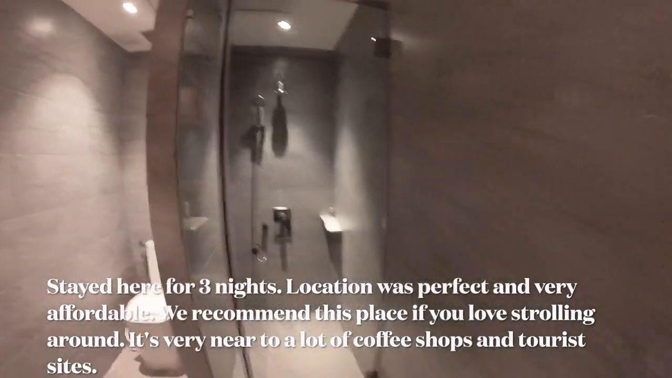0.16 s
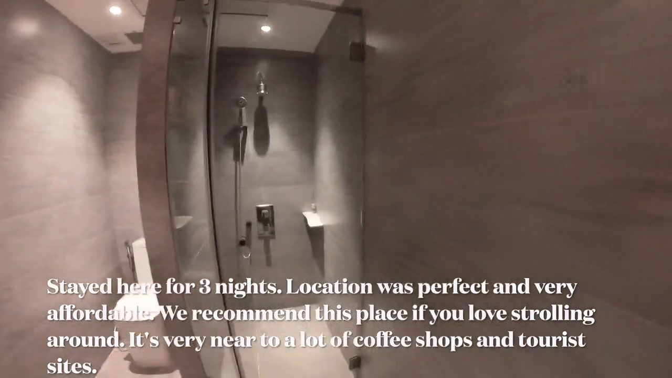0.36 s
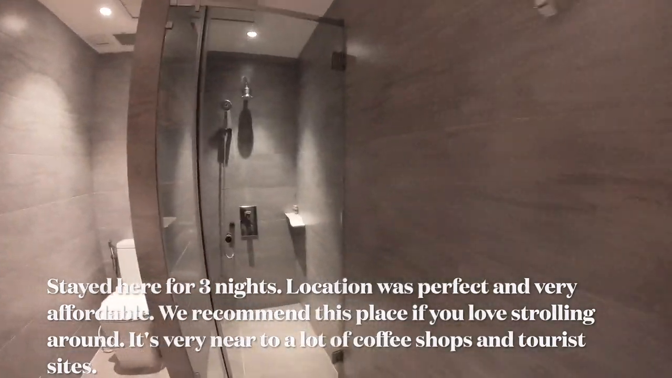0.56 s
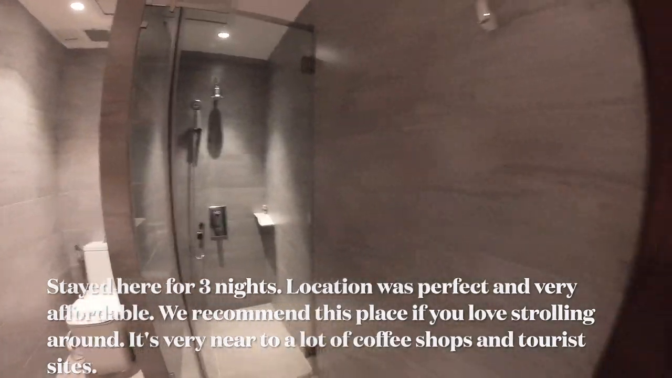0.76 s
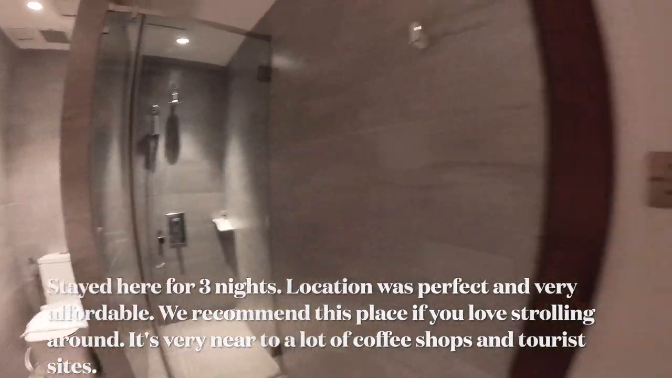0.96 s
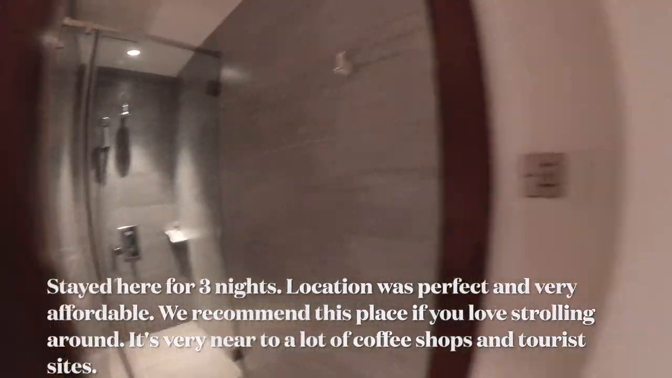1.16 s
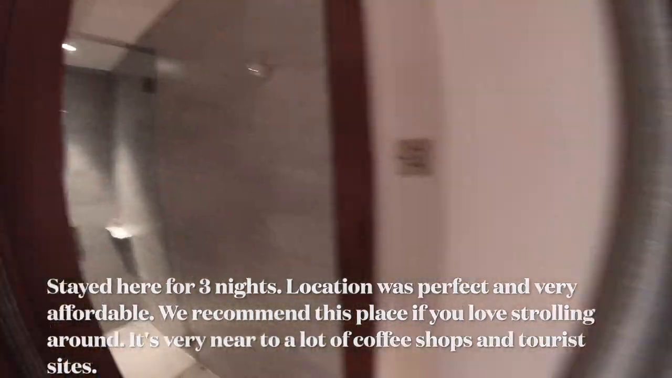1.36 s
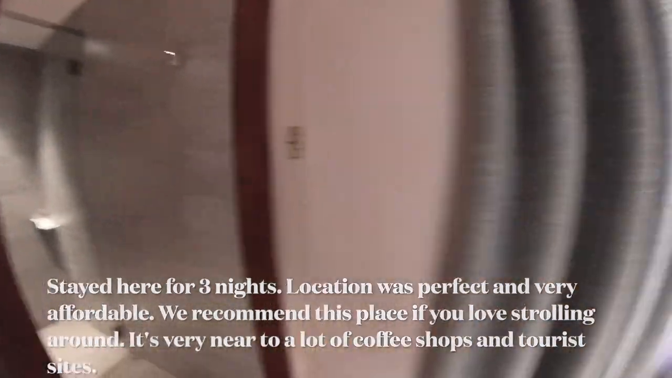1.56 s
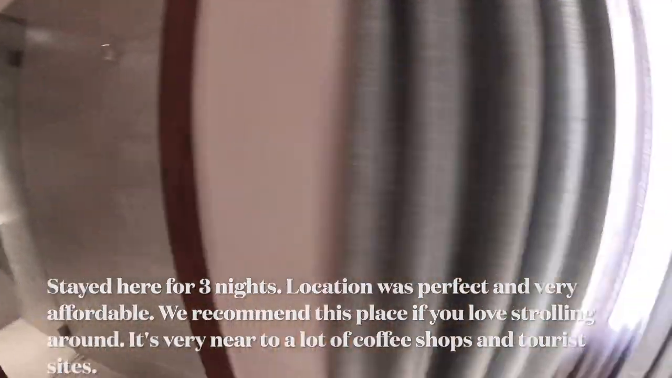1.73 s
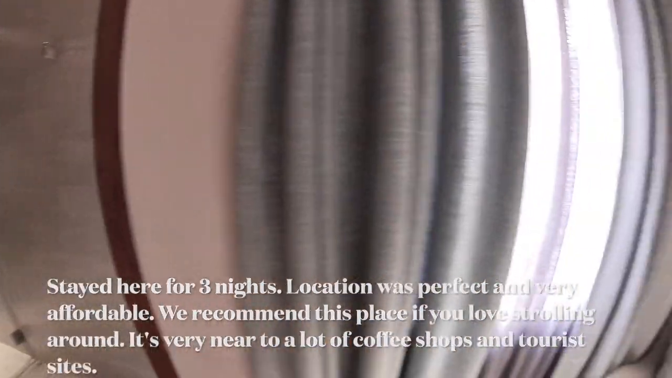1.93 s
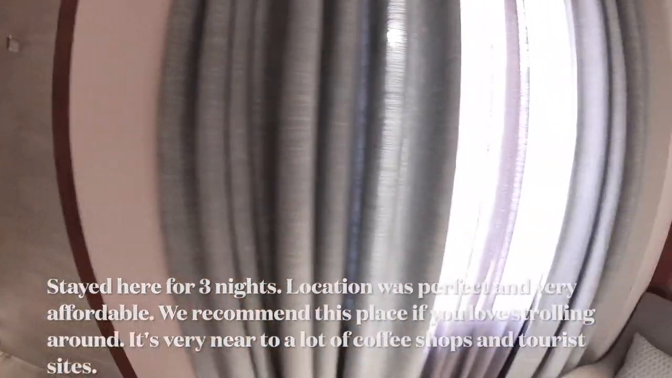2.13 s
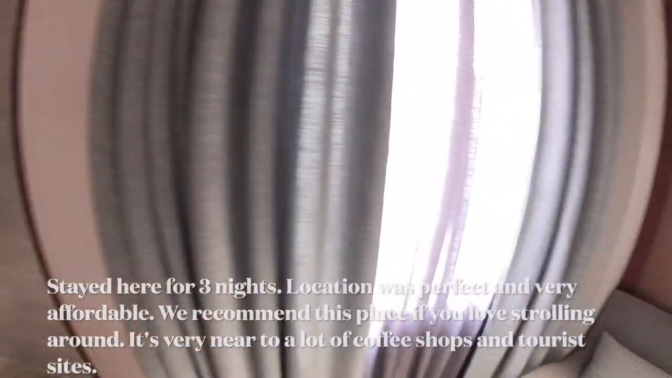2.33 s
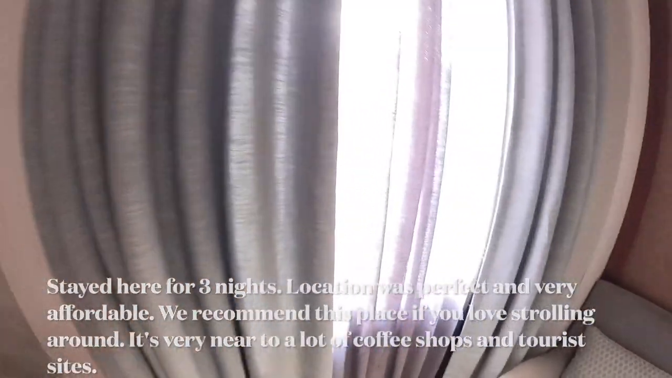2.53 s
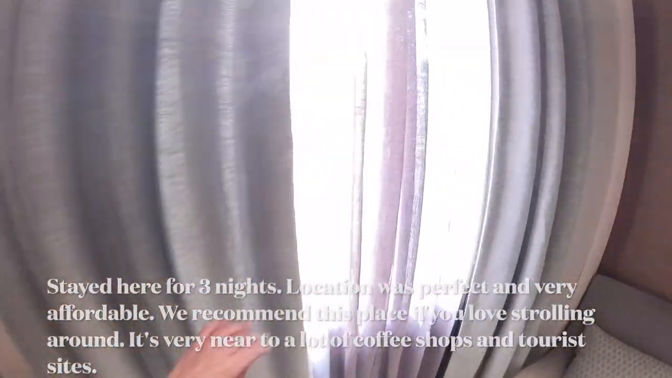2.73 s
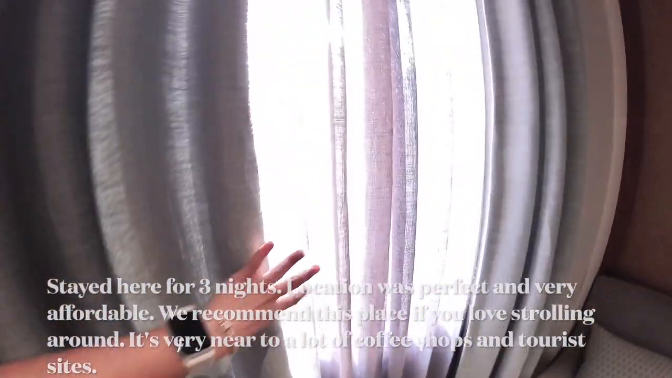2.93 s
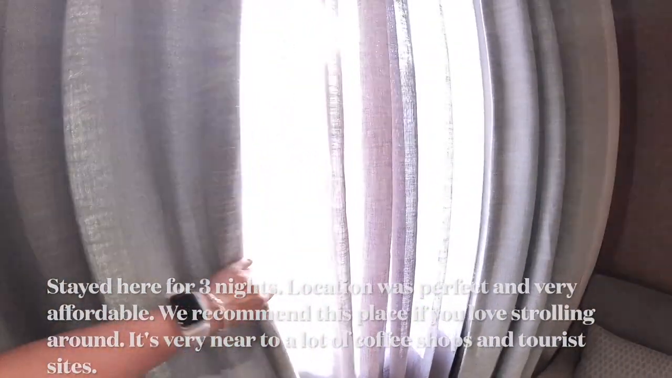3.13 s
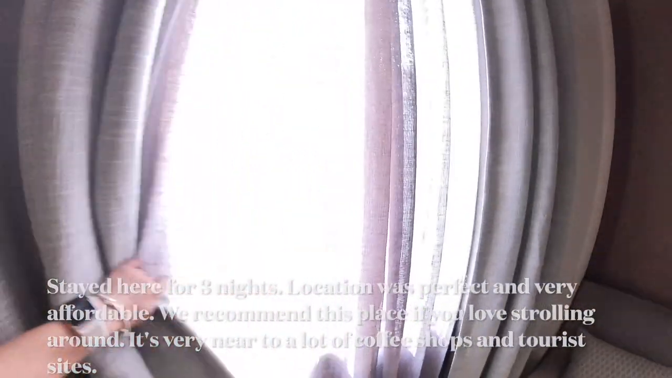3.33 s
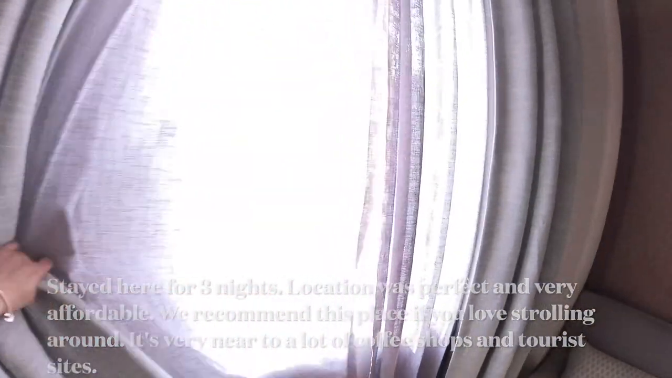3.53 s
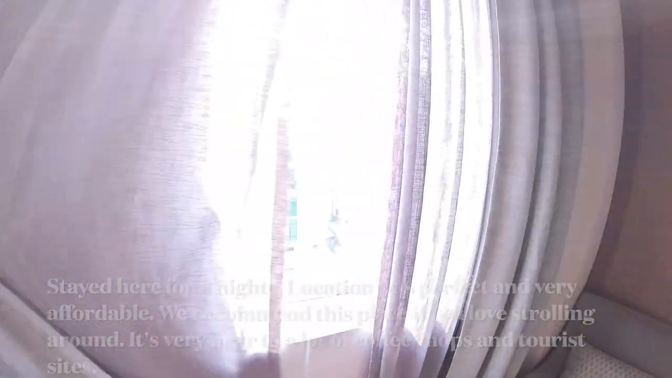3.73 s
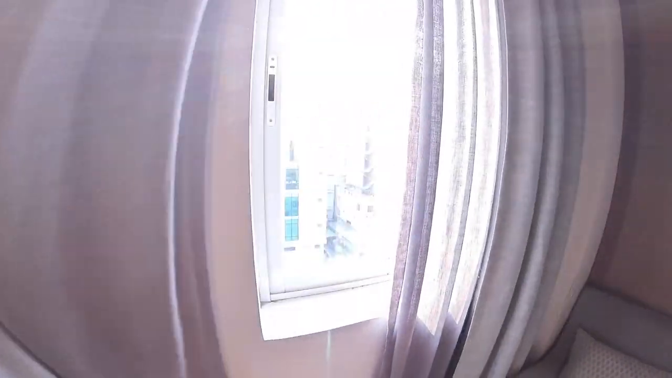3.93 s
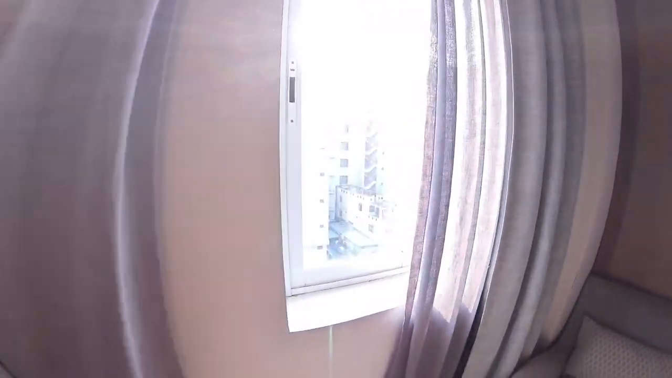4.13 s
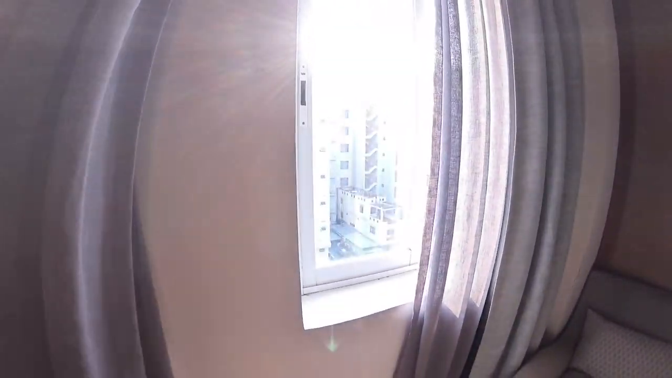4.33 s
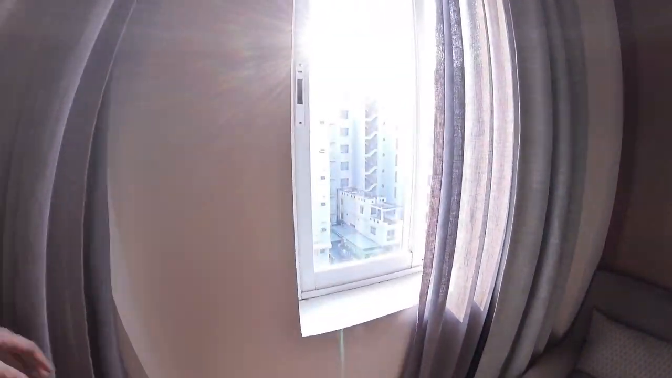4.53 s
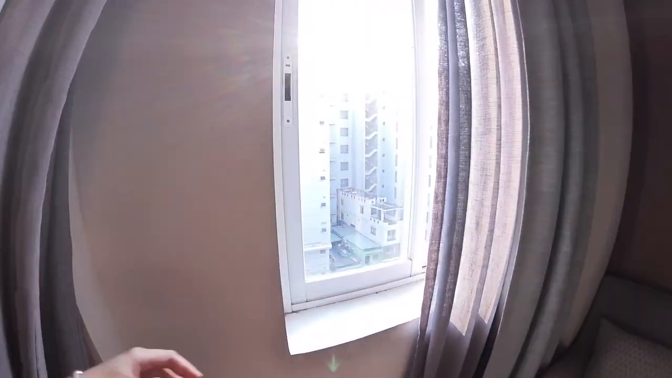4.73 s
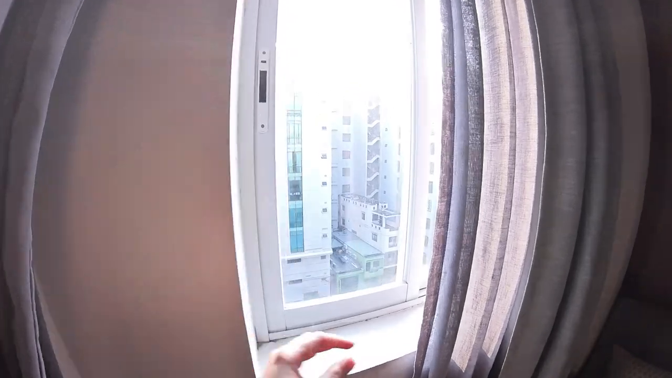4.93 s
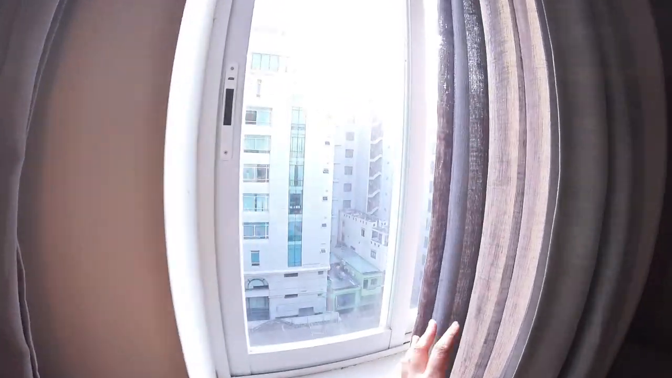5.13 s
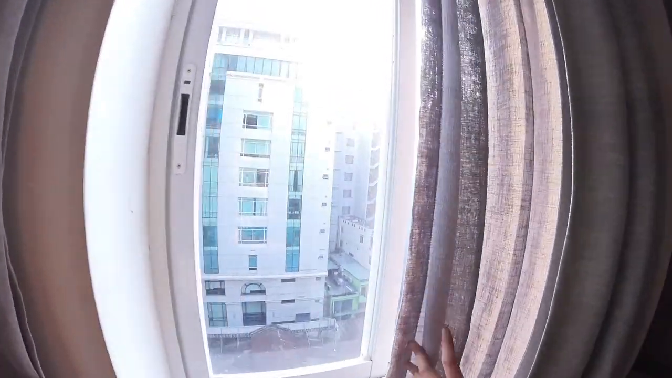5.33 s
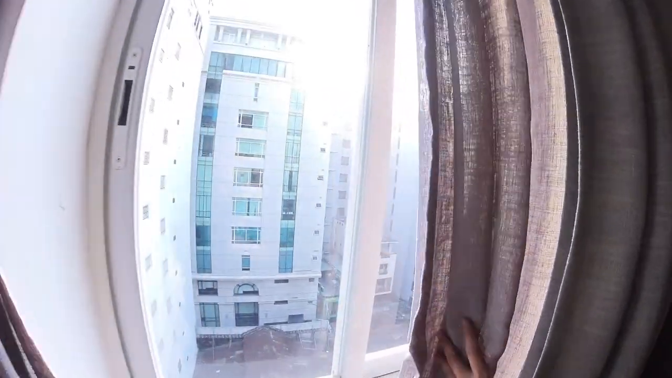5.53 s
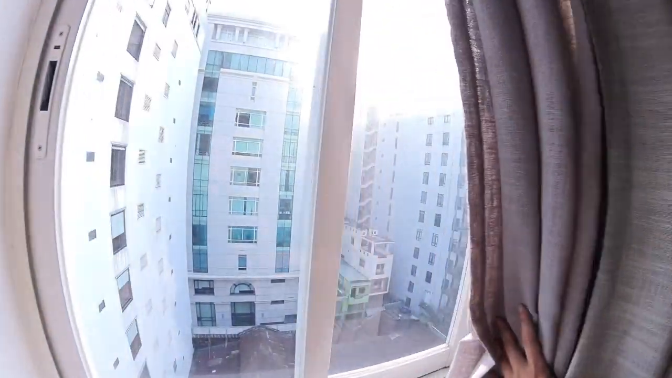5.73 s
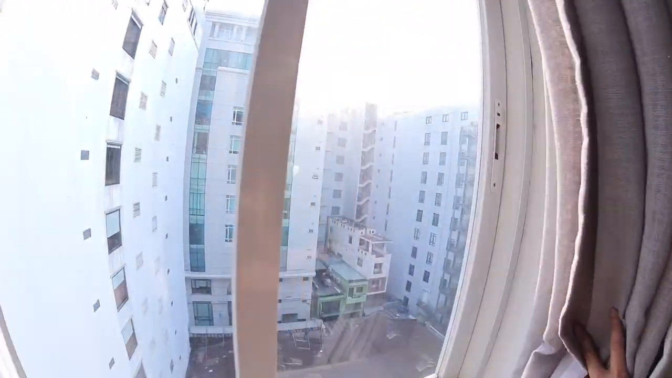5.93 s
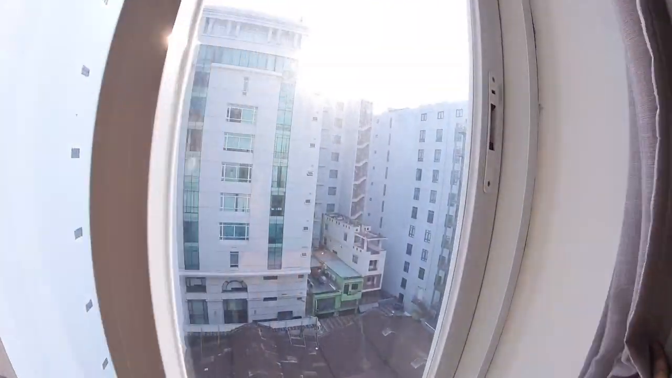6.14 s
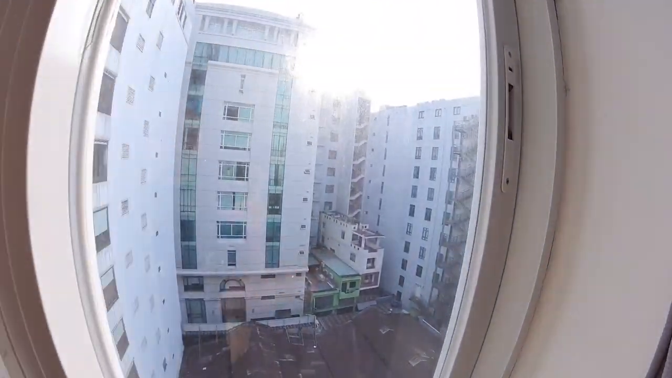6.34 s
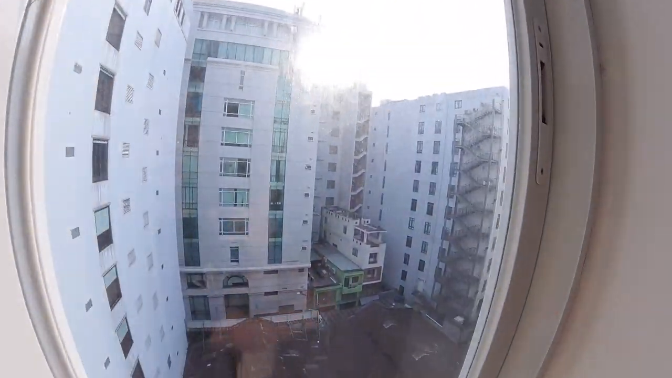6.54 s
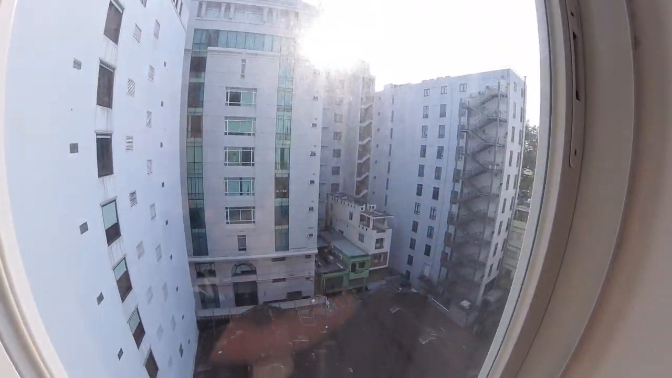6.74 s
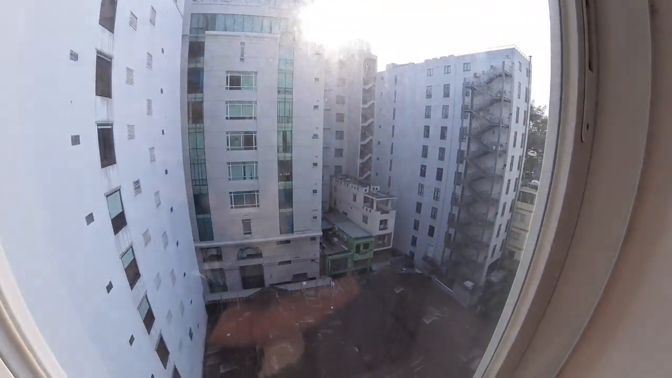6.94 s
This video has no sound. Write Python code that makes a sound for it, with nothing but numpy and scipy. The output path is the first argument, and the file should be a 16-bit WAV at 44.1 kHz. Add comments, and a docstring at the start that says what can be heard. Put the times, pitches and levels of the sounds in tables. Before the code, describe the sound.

Dull heel thuds cross a hotel room floor, then two curtains scrape along a rail with rattling gliders and bright clacks over faint town murmur.

```python
"""Heels thud on the floor of a hotel room: pushes ring the boards and floor modes, and a wall echoes.
Two curtains are drawn: dense slips scrape through the rail, sparser taps ring the gliders,
filtered noise rolls; clicks with a ring make the clacks. Clothes swish in swells of coloured noise.
The town murmurs behind as rumble, traffic wash and hiss, its rumble and wash rising towards the end."""
import sys
import numpy as np
from scipy import signal
from scipy.fft import rfft, irfft
from scipy.io import wavfile
from scipy.ndimage import uniform_filter1d

SR = 44100
rng = np.random.default_rng(int(sys.argv[2]) if len(sys.argv) > 2 else 0)


def put_to_file(sound):
    """Save the sound as 16-bit audio at rate SR, in the file named by the first command-line argument."""
    columns = np.atleast_2d(sound).T  # one column per channel
    safe = np.clip(columns, -1, 1)
    whole_steps = np.round(safe * 32767)
    wavfile.write(sys.argv[1], SR, whole_steps.astype(np.int16))


N = 308160
TIME_S = np.arange(N) / SR
FFT_HZ = np.fft.rfftfreq(N, 1 / SR)

# Footsteps: start_s, level_db, board_hz, heel_corner_hz, sole_slap_db and scuff_db (relative to the step)
STEPS = [(.052, -13, 345, 590, -39, -34), (0.842, -32.5, 342, 400, -41.5, -37),
         (1.340, -17.5, 368, 870, -55, -60), (2.144, -36.5, 385, 660, -41, -52),
         (2.7038, -23, 400, 1020, -31, -56), (3.309, -31, 315, 1860, -26.5, -56),
         (4.893, -32.5, 352, 543, -34, -41), (5.598, -23.5, 354, 750, -29, -55)]
# Dull push of a heel on the floor: freq_hz, level_db
THUD = [(40, -63), (130, -10), (225, 3.5), (330, 0.5), (480, -1), (620, -5), (800, -10), (1100, -18.5),
        (1400, -34), (2500, -56), (8000, -68)]
# Ringing of the whole floor: freq_hz, level_db, t60_s
FLOOR_MODES = [(171, -30, 0.3), (231.8, -13, 0.26), (293, -19.5, 0.37), (374.6, -19, 0.35),
               (430, -14, 0.12), (504, -23.5, 0.18), (637, -23.5, 0.22), (750, -17, 0.064),
               (889, -38, 0.18), (1040, -35, 0.12)]
# Floor giving under the walker's weight: start_s, level_db, pitch_hz
FLOOR_SAGS = [(1.601, -43, 52.7), (1.66, -45, 46)]

# Curtain slides; the short one is a last swing after the first pull:
# start_s, length_s, side, scrape_db, chatter_db, rolling_db, glider_pitch_factor
SLIDES = [(3.406, 0.89, "left", -32.5, -45.5, -41.5, .975), (4.267, 0.2, "left", -55, -76, -55.5, 1.1),
          (5.48, 1.134, "right", -38.5, -47, -39, 0.957)]
# Scrape colour of each half of the rail: freq_hz, level_db
LEFT_RAIL = [(60, -4.5), (170, 13), (480, 11.5), (650, 12), (900, 14), (1080, 8), (1200, 7.5), (1500, 0),
             (2900, 2.5), (5200, -2), (6500, 5), (8000, -4.5), (11500, -13.5), (14000, -24)]
RIGHT_RAIL = [(60, 4.5), (170, 20.5), (450, 16.5), (760, 15), (1000, -2.5), (1300, 10.5), (1650, 2.5),
              (2400, 5), (2950, 7.5), (4800, 0), (7000, 5.5), (8500, -3), (11500, -14), (14000, -37)]
# Hollow resonances of the rail: freq_hz, width_hz, gain_db (over the exciting sound)
RAIL_MODES = [(480, 8.3, 10), (770, 11, -9), (814, 16, 2.5), (916, 9.2, 13.5), (1011, 40, 10.5),
              (1940, 95, -7), (2740, 150, -7), (3980, 300, -6), (9240, 360, -13)]
# Rolling rumble in each half of the rail: freq_hz, level_db
LEFT_ROLL = [(150, -13), (380, -6), (480, 10), (620, -11), (800, 1.5), (1060, -5.5), (1200, -11),
             (1600, -8.5), (4000, -66)]
RIGHT_ROLL = [(150, -14), (430, 1.5), (600, -9.5), (770, -3), (1060, -4.5), (1250, -10.5), (1600, -24),
              (4000, -43)]
# Ring of a glider, before its pitch factor and radiation band: freq_hz, width_hz, gain_db
GLIDER_MODES = [(6565, 128, -0.5), (6490, 190, -21), (6940, 74, -20), (7260, 84, -15)]
GLIDER_COUNT = 6
SCRAPE_POWER, CHATTER_POWER, ROLL_POWER = 1.45, 1.52, 1.05  # exponents on the speed arches
CROWDING_SHARE = 0.15  # rise of the gliders' pitch by the end of a slide, where they are bunched
ROLL_WIDTH_HZ, ROLL_PEAK_DB = 290, 3.5  # hollow note of the rail

# Hardest knocks of glider on glider, before the common trim: start_s, level_db, ring_gain_db
CLACKS = [(3.4692, -32.5, 25), (3.5117, -40, 7), (3.558, -47, 20), (3.565, -31, 29), (3.596, -34, 27),
          (3.887, -26, 24), (4.1453, -31, 16), (4.1753, -29.5, 26.5), (5.581, -48, 24), (5.6378, -45, 25),
          (5.6788, -45, 14), (5.78, -36, 18), (5.827, -41, 25)]
# Click of a knock: freq_hz, level_db
CLICK = [(150, -25), (900, 16.5), (1500, -10.5), (3000, 13), (5500, 3), (8000, 10.5), (11500, 1),
         (14000, -12)]
# Light ticks of hooks as the curtains sway, before the room: start_s, peak_db, ring_hz
TICKS = [(4.5339, -39.5, 5360), (4.6622, -50, 7400), (5.29, -40.5, 5400)]
RATTLE_S = 0.0014  # decay constant of a clack's click
# Lighter knocks while the slack is taken up: share of the slide, rate, level over the scrape, ring gain
SLACK_SHARE, SLACK_PER_S, SLACK_DB, SLACK_RING_DB = 0.33, 20, -3, 12

# Broad swishes of clothes and curtain cloth: middle_s, length_s, level_db, brightest_hz
SWISHES = [(.51, .13, -59.5, 7500), (.93, 0.22, -70, 9300), (1.108, 0.056, -68.5, 3520),
           (1.424, 0.06, -71, 2270), (1.54, 0.15, -69, 1790), (2.3, 0.035, -67.5, 1980),
           (2.654, .06, -71, 2360), (2.93, 0.056, -65, 3530), (4.451, 0.04, -62, 2050),
           (4.57, 0.18, -67, 8760), (6.79, 0.13, -72.5, 1940)]
# Colour of rubbing cloth and of sole scuffs: freq_hz, level_db
CLOTH = [(300, -10), (1000, 20), (1500, 5.5), (2700, -2.5), (4000, 5), (8500, -2), (11000, 0.5),
         (13000, -17.5)]
# Narrow tones in every rustle: freq_hz, width_hz, gain_db (over the rustle)
RUSTLE_TONES = [(2010, 62, 6.5), (2960, 83, 6), (3990, 160, -2), (8120, 200, -1)]
# Faint rustles in between: rate, length, level, range of their brightest pitch
RUSTLES_PER_S, RUSTLE_S, RUSTLE_DB, RUSTLE_LOW_HZ, RUSTLE_HIGH_HZ = 1.6, 0.1, -77, 1680, 2600

# Town and building murmur before and after the first curtain opens, before the trims:
# time_s, rumble_db, wash_db
TOWN_SHUT = [(0.25, -52, -58.5), (0.79, -57.5, -64.5), (1.44, -46.5, -65), (1.72, -53, -72.5),
             (3.04, -53.5, -61), (3.4, -48.5, -66)]
TOWN_OPEN = [(4.4, -53, -60.5), (5.5, -48.5, -59.5), (6.5, -43, -56.5), (6.99, -47, -54)]
# Colours of the low rumble, traffic wash and hiss: freq_hz, level_db
RUMBLE = [(20, -39), (35, -14.5), (48, 7), (75, -5.5), (110, 3), (170, 4.5), (280, -4), (400, -5.5),
          (600, -25), (1200, -54.5)]
WASH = [(150, -5), (450, 1), (620, 0), (800, -1.5), (930, -2), (1060, -6), (1250, -13.5), (1600, -23.5),
        (2000, -22), (2600, -31), (9000, -60)]
HISS = [(100, 14), (2000, -1), (2800, 0), (4000, 4.5), (6500, 2), (10000, -7.5), (12000, -11), (14000, -61)]

# Decay of the room tail: freq_hz, t60_s
ROOM = [(100, 0.47), (400, 0.35), (1000, 0.4), (4000, 0.31), (12000, 0.13)]
EDGE_HZ = 14600  # band limit


def footsteps(ring_db=-4.0, ring_growth=0.28, wet_db=-6, wet_growth=0.12,
              echo_s=0.021, echo_share=0.5, echo_db=-12, scuff_t60_s=0.4, sole_s=0.018,
              contact_s=0.0019, board_width_hz=60, board_db=7):
    """Each heel gives a short push, booms in its board and rings the floor; the far wall answers."""
    t = np.arange(SR // 2) / SR
    out = np.zeros(N)
    push = colour(signal.unit_impulse(len(t)), THUD)
    modes = sum(amp(db) * np.sin(2 * np.pi * hz * t) * t60_decay(t, t60_s)
                for hz, db, t60_s in FLOOR_MODES)
    landing = 1 - np.exp(-(t / contact_s) ** 2)  # the heel lands gradually
    sole_band = signal.butter(3, [650, 2200], "bandpass", fs=SR, output="sos")
    heaviest_db = max(row[1] for row in STEPS)
    for start_s, level_db, board_hz, corner_hz, sole_db, scuff_db in STEPS:
        lightness_db = level_db - heaviest_db
        boom = push + resonate(push, [(board_hz, board_width_hz, board_db)])
        slap = evened(signal.sosfilt(sole_band, rng.standard_normal(len(t)))) * np.exp(-t / sole_s)
        ringing = amp(ring_db + ring_growth * lightness_db) * modes  # light steps stir the floor less
        blow = (boom / abs(boom).max() + ringing + amp(sole_db) * slap) * landing
        step = signal.lfilter(*signal.butter(2, corner_hz, fs=SR), blow)  # soft heels lack treble
        step = signal.lfilter(*signal.butter(2, 140, "highpass", fs=SR), step)  # boards radiate little bass
        step *= amp(level_db + 7) / abs(step).max()
        scuff = colour(rng.standard_normal(len(t)), CLOTH) * t60_decay(t, scuff_t60_s)
        heard = step + amp(level_db + scuff_db) * scuff
        delay_s = echo_s * (1 + echo_share * rng.random())  # wall distance differs from step to step
        add(heard, delay_s, amp(echo_db) * step)
        add(out, start_s, room(heard, wet_db + wet_growth * lightness_db))
    for start_s, level_db, hz in FLOOR_SAGS:
        swell = t / 0.03 * np.exp(1 - t / 0.03)  # peaks after 30 ms
        add(out, start_s, amp(level_db) * np.sin(2 * np.pi * hz * t) * swell)
    return out


def curtain(side, rail, roll, jerk_db, chatter_per_s, unlike_share, patchy_db, skew,
            bunched_db, first_hz, last_hz, roll_skew):
    """In arches of speed, dense slips excite the rail, sparser taps the gliders, and noise rolls."""
    jerk = amp(jerk_db * wander(rate_hz=31.0))  # the cloth tugs the gliders unevenly
    slips = impacts(per_s=5000, spread_db=3.5)
    scrape = evened(patchy(colour(slips + resonate(slips, RAIL_MODES), rail), patchy_db))
    rolling = evened(patchy(noise(roll), depth_db=6.5, patch_s=0.36, patch_hz=170))
    taps = impacts(per_s=chatter_per_s, spread_db=3)
    owner = rng.integers(GLIDER_COUNT, size=N)  # glider struck by each tap
    out = np.zeros(N)
    for start_s, length_s, which, scrape_db, chatter_db, roll_db, pitch in SLIDES:
        if which != side:
            continue
        on = (TIME_S > start_s) & (TIME_S < start_s + length_s)
        progress = (TIME_S[on] - start_s) / length_s
        speed = np.sin(np.pi * progress ** skew)
        out[on] += amp(scrape_db) * speed ** SCRAPE_POWER * scrape[on]

        crowding = pitch * (1 + CROWDING_SHARE * progress ** 3)
        chatter = sum(ring(taps[on] * (owner[on] == k), crowding * (1 + unlike_share * offset))
                      for k, offset in enumerate(np.linspace(-1, 1, GLIDER_COUNT)))
        chatter_gain = amp(chatter_db + bunched_db * progress ** 2)  # bunching shifts the level
        out[on] += chatter_gain * speed ** CHATTER_POWER * evened(chatter)

        note_hz = first_hz + (last_hz - first_hz) * progress  # sinks as the gliders travel
        hollow = rolling[on] + amp(ROLL_PEAK_DB) * glide(rolling[on], note_hz, ROLL_WIDTH_HZ)
        roll_speed = np.sin(np.pi * progress ** roll_skew)
        out[on] += amp(roll_db) * roll_speed ** ROLL_POWER * evened(hollow)
    return out * jerk


def clacks(trim_db=-2.5, pitch=0.98, tick_s=0.0052, tick_width_hz=550, tick_ring_db=20, rail_db=11):
    """Hooks tick against the rail; gliders hit neighbours with a brief rattling click and a ring."""
    t = np.arange(SR // 20) / SR
    out = np.zeros(N)
    for start_s, peak_db, hz in TICKS:
        click = colour(rng.standard_normal(len(t)) * np.exp(-t / tick_s), CLICK)
        tick = click + resonate(click, [(hz, tick_width_hz, tick_ring_db)])
        tick = tick + amp(rail_db) * resonate(click, RAIL_MODES)
        add(out, start_s, amp(peak_db) * tick / abs(tick).max())
    for start_s, level_db, ring_db in list(CLACKS) + slack_knocks():
        click = colour(rng.standard_normal(len(t)) * np.exp(-t / RATTLE_S), CLICK)
        add(out, start_s, amp(level_db + trim_db) * (click + amp(ring_db) * ring(click, pitch)))
    return out


def slack_knocks(lag_s=0.081, swell_db=-19, spread_db=3):
    """Gliders catch in turn early in a slide, harder as it gathers speed: rows like CLACKS."""
    rows = []
    for start_s, length_s, _, scrape_db, *_ in SLIDES:
        for k, (jitter, strength) in enumerate(rng.random(size=(16, 2))):
            after_s = (k + jitter) / SLACK_PER_S
            slack = 1 - after_s / (SLACK_SHARE * length_s)
            if slack > 0:
                level_db = scrape_db + SLACK_DB + swell_db * slack + spread_db * (2 * strength - 1)
                rows.append((start_s + lag_s + after_s, level_db, SLACK_RING_DB))
    return rows


def ring(x, factor=1.0):
    """Rings the glider's modes at a pitch factor; they radiate in one narrow treble band."""
    out = sum(amp(db) * glide(x, hz * factor, width_hz) for hz, width_hz, db in GLIDER_MODES)
    return signal.sosfilt(signal.butter(2, [5700, 8000], "bandpass", fs=SR, output="sos"), out)


def cloth(grain_db=2, width_share=0.21, bright_db=11):
    """Fabric rubs in soft swells, each brightest at its own pitch, with faint random rustles."""
    rub = noise(CLOTH) * amp(grain_db * wander(rate_hz=37))
    rub = rub + resonate(rub, RUSTLE_TONES)
    out = np.zeros(N)
    rows = list(SWISHES)
    for k, (jitter, height) in enumerate(rng.random(size=(40, 2))):
        middle_s = (k + jitter) / RUSTLES_PER_S
        hz = RUSTLE_LOW_HZ * (RUSTLE_HIGH_HZ / RUSTLE_LOW_HZ) ** height
        if middle_s < N / SR:
            rows.append((middle_s, RUSTLE_S, RUSTLE_DB, hz))
    for middle_s, length_s, level_db, hz in rows:
        near = abs(TIME_S - middle_s) < 1.5 * length_s
        swish = evened(rub[near] + resonate(rub[near], [(hz, hz * width_share, bright_db)]))
        swell = np.exp(-np.pi * ((TIME_S[near] - middle_s) / length_s) ** 2)
        out[near] += amp(level_db) * swish * swell
    return out


def town(rumble_trim_db=2, wash_trim_db=2, hiss_db=-76):
    """Low rumble and far traffic behind the glass follow level curves over a faint hiss."""
    time_s, rumble_db, wash_db = np.vstack([TOWN_SHUT, TOWN_OPEN]).T
    unrest_db = 1.62 * wander(rate_hz=4.7)
    rumble = noise(RUMBLE) * amp(np.interp(TIME_S, time_s, rumble_db) + rumble_trim_db + unrest_db)
    wash = noise(WASH) * amp(np.interp(TIME_S, time_s, wash_db) + wash_trim_db)
    return rumble + wash + amp(hiss_db) * noise(HISS)


def room(x, wet_db, delay_s=0.0043):
    """Adds a diffuse tail of decaying noise whose treble dies first."""
    hz, t, z = signal.stft(rng.standard_normal(SR // 2), SR, nperseg=256)
    decay = t60_decay(t, read(ROOM, hz)[:, None])
    tail = signal.istft(z * decay, SR, nperseg=256)[1]
    tail *= np.clip(np.arange(len(tail)) / SR / delay_s - 1, 0, 1)  # silent, then fades in
    return x + amp(wet_db) * signal.fftconvolve(x, tail / np.linalg.norm(tail))[:len(x)]


def patchy(x, depth_db, patch_s=0.078, patch_hz=500):
    """Drifts the colour in random patches of time and frequency."""
    z = signal.stft(x, nperseg=512, noverlap=384)[2]
    field = uniform_filter1d(rng.standard_normal(z.shape), max(round(patch_hz * 512 / SR), 1), axis=0)
    field = evened(uniform_filter1d(field, max(round(patch_s * SR / 128), 1), axis=1))
    return signal.istft(z * amp(depth_db * field), nperseg=512, noverlap=384)[1][:N]


def glide(x, hz, width_hz):
    """A resonance of gain 1 that follows a pitch curve: shift to 0 Hz, smooth, shift back."""
    turn = np.exp(2j * np.pi * np.cumsum(hz * np.ones(len(x))) / SR)
    r = np.exp(-np.pi * width_hz / SR)
    return 2 * (turn * signal.lfilter([1 - r], [1, -r], x / turn)).real


def resonate(x, modes):
    """Sum of resonances, each with its own gain at the peak."""
    return sum(amp(db) * signal.lfilter(*signal.iirpeak(hz, hz / width_hz, SR), x)
               for hz, width_hz, db in modes)


def impacts(per_s, spread_db):
    """Random train of tiny blows, a few much harder than the rest."""
    size = amp(spread_db * np.minimum(rng.exponential(1, N), 4))
    return evened(size * rng.choice([-1, 1], N) * (rng.random(N) < per_s / SR))


def colour(x, points):
    """Causal minimum-phase filter with the given spectrum and unit energy."""
    log_gain = np.log(amp(read(points, abs(np.fft.fftfreq(4096, 1 / SR)))))
    taps = np.fft.ifft(np.exp(np.conj(signal.hilbert(log_gain)))).real
    taps = taps[:len(taps) // 2]
    return signal.fftconvolve(x, taps / np.linalg.norm(taps))[:len(x)]


def noise(points):
    """Coloured noise with an rms of one."""
    return evened(colour(rng.standard_normal(N), points))


def wander(rate_hz):
    """Smooth random motion up to about the given rate, rms one."""
    return evened(irfft(rfft(rng.standard_normal(N)) / (1 + (FFT_HZ / rate_hz) ** 4), N))


def t60_decay(t, t60_s):
    """Exponential decay by 60 dB in t60_s."""
    return np.exp(-np.log(1000) * t / t60_s)


def amp(db):
    """Decibels to gain."""
    return 10 ** (np.asarray(db) / 20)


def evened(x):
    """Scales to an rms of one."""
    return x / np.sqrt(np.mean(x ** 2) + 1e-20)


def read(points, hz):
    """Joins (freq_hz, value) points on a log-frequency axis."""
    f, value = np.transpose(points)
    return np.interp(np.log(hz + 1), np.log(f + 1), value)


def add(mix, start_s, sound):
    """Lays a sound into the mix at start_s."""
    part = mix[max(round(start_s * SR), 0):][:len(sound)]
    part += sound[:len(part)]


def scene():
    """Sums steps, both curtains, clothes and town."""
    left = curtain("left", LEFT_RAIL, LEFT_ROLL, jerk_db=1.66, chatter_per_s=280, unlike_share=0.005,
                   patchy_db=1.5, skew=1.005, bunched_db=9, first_hz=1050, last_hz=830, roll_skew=0.71)
    right = curtain("right", RIGHT_RAIL, RIGHT_ROLL, jerk_db=1.78, chatter_per_s=500, unlike_share=0.049,
                    patchy_db=2.2, skew=1.2, bunched_db=-14, first_hz=1166, last_hz=420, roll_skew=0.96)
    curtains = room(left + right + clacks(), wet_db=-12.0)
    clothes = patchy(cloth(), depth_db=2.0, patch_s=0.089, patch_hz=298.5)
    murmur = patchy(town(), depth_db=2.45, patch_s=0.15, patch_hz=170)
    return (footsteps() + curtains + clothes + murmur)[None]


def record(dry):
    """The microphone's top end droops before the band limit."""
    dull = signal.sosfilt(signal.butter(6, 12500, fs=SR, output="sos"), dry)
    band_limit = signal.firwin(511, EDGE_HZ, window=("kaiser", 9), fs=SR)
    return signal.oaconvolve(dull, band_limit[None], "same")


dry = scene()
out = record(dry)
put_to_file(out)
```